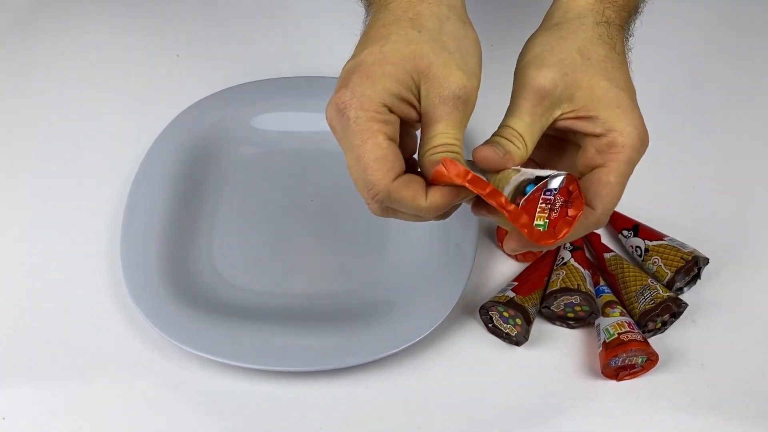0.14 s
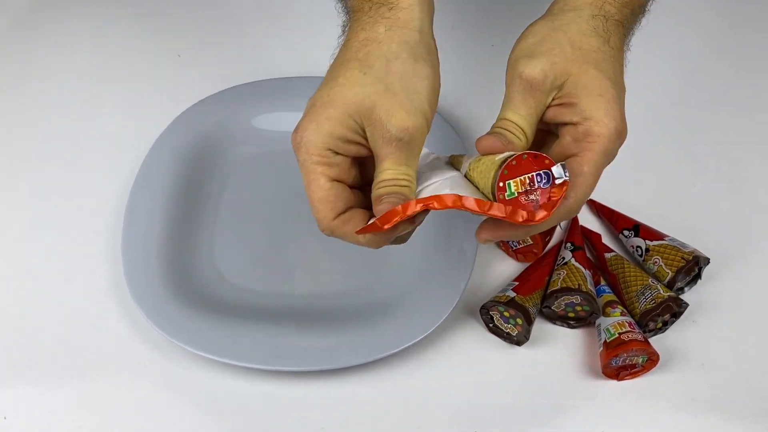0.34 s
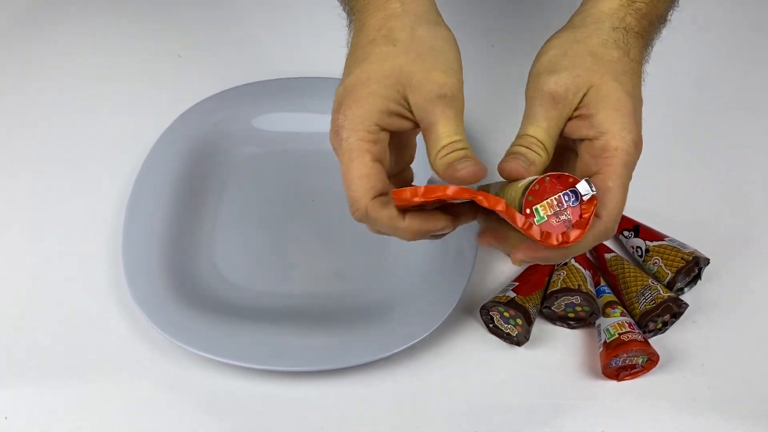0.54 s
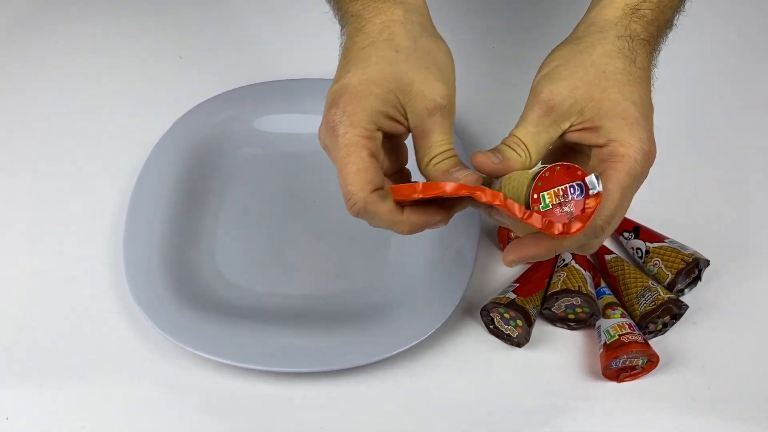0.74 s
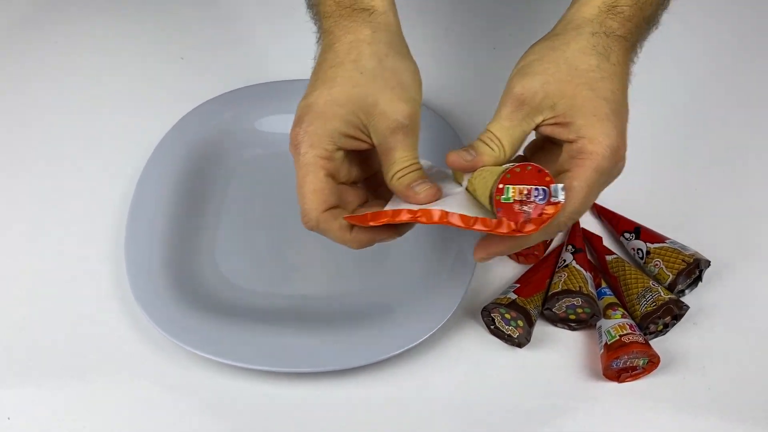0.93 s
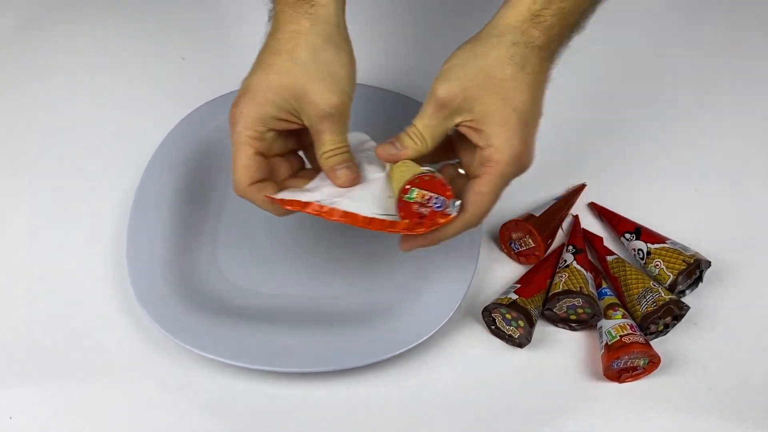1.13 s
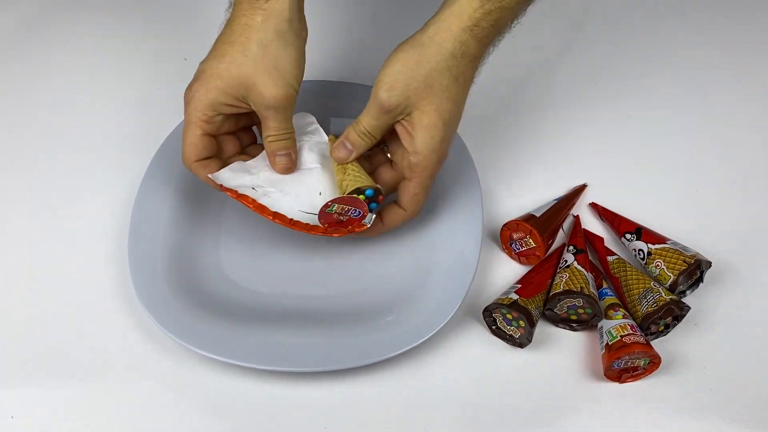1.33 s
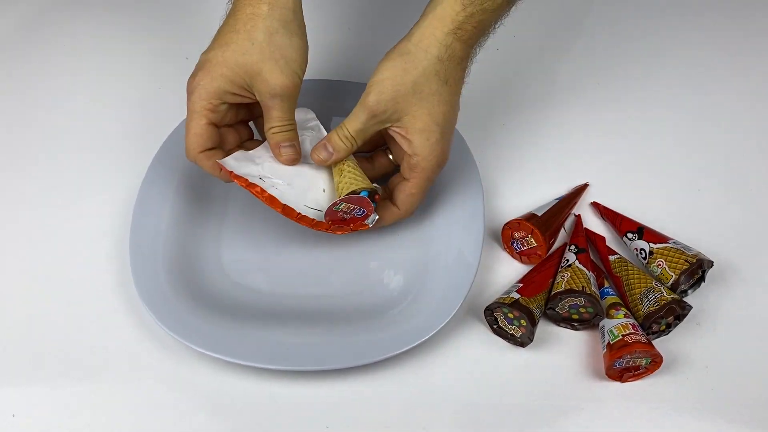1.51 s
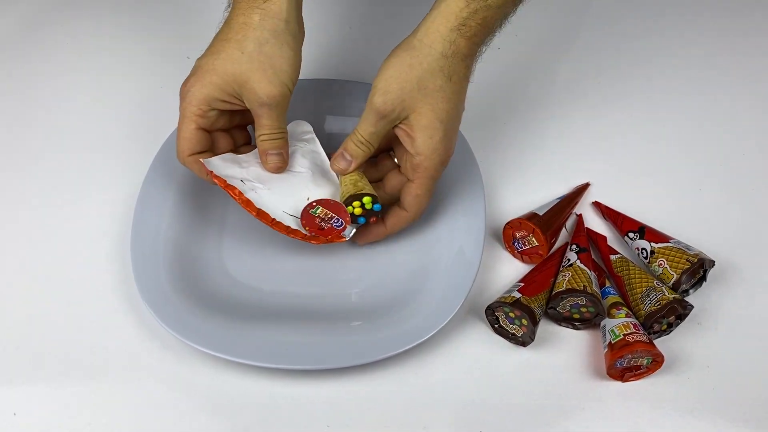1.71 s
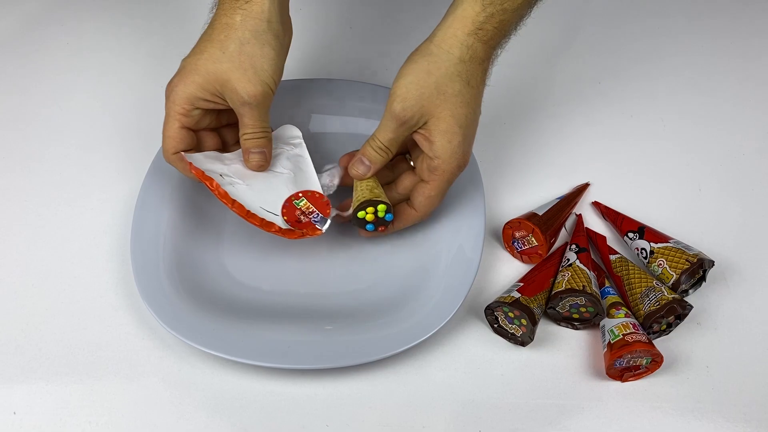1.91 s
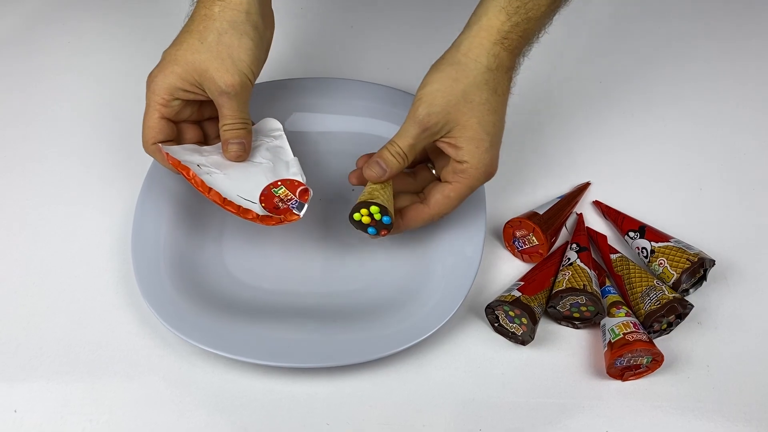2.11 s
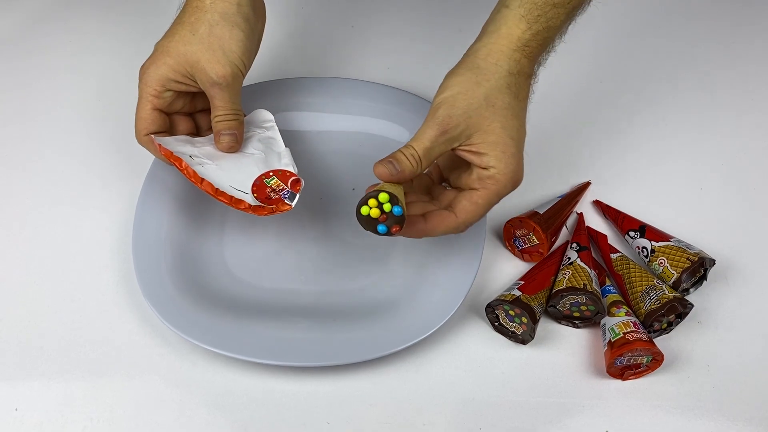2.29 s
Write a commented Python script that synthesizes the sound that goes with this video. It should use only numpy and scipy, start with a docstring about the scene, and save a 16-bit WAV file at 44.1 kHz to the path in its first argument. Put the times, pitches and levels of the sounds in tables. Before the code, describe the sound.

Foil wrapper crinkles close up in a small quiet room, starting faint, bursting into sharp cracks, then sporadic rustles and hollow buckles, a dull knock, more crackling and one final bright flick as it springs free.

```python
"""Peeling a chocolate cone

Hands peel a stiff foil-paper wrapper off a chocolate cone above a table, close to a stereo microphone in a small room.
Each pull sheds dense tiny crackles, made of random clicks that ring facets; creases snap as short noise bursts,
the rim crunches as noise through its modes, broad panels buckle with a hollow pop of decaying sines,
a hand bumps the table's low modes, and the freed wrapper gives a last ringing flick."""
import sys
import numpy as np
from scipy import signal
from scipy.fft import rfft, irfft
from scipy.io import wavfile
from scipy.ndimage import uniform_filter1d

SR = 44100
rng = np.random.default_rng(int(sys.argv[2]) if len(sys.argv) > 2 else 0)


def dump(signal):
    """Clip the signal to [-1, 1] and save it as 16-bit WAV at the path in sys.argv[1]."""
    limited = np.clip(np.atleast_2d(signal).T, -1, 1)
    pcm = np.round(limited * 32767).astype(np.int16)
    wavfile.write(sys.argv[1], SR, pcm)


N = 103635
T = np.arange(N) / SR  # seconds, whole scene
SHORT = T[:2048]  # seconds, one brief event


def undb(db):
    """Decibels to gain."""
    return 10 ** (np.asarray(db) / 20)


def unit(x):
    """Scale to rms 1."""
    return x / np.sqrt(np.mean(x ** 2))


def blow(x):
    """Scale a transient to the energy of one millisecond at rms 1."""
    return unit(x) * np.sqrt(0.001 * SR / x.shape[-1])


def band(x, lo_hz, hi_hz, order=3):
    """Band-pass."""
    edges_hz = [lo_hz, min(hi_hz, SR / 2 - 100)]
    return signal.sosfilt(signal.butter(order, edges_hz, "band", fs=SR, output="sos"), x)


def colour(x, points):
    """Minimum-phase filter through (Hz, dB) points, so that nothing sounds ahead of its cause."""
    hz, db = np.array(points, float).T
    size = 2 ** 18
    f = np.maximum(np.arange(size // 2 + 1) * SR / size, 1)
    cepstrum = irfft(np.log(undb(np.interp(np.log(f), np.log(hz), db))))
    # Fold the cepstrum onto positive time
    cepstrum[1:size // 2] *= 2
    cepstrum[size // 2 + 1:] = 0
    return irfft(rfft(x, size) * np.exp(rfft(cepstrum)))[..., :N]


def pair(x, lag_ms):
    """A sound reaches the two microphones at different moments: left late if positive, right if negative."""
    spectrum = rfft(x)
    f = np.arange(spectrum.shape[-1]) * SR / x.shape[-1]
    late_s = np.maximum([[lag_ms], [-lag_ms]], 0) / 1000
    return irfft(spectrum * np.exp(-2j * np.pi * f * late_s), x.shape[-1])


def add(out, x, start):
    """Mix a sound in at a time."""
    i = max(int(start * SR), 0)
    out[:, i:i + x.shape[-1]] += x[..., :N - i]


def swell(rise):
    """Quick swell and decay, peak 1."""
    return SHORT / rise * np.exp(1 - SHORT / rise)


def strike(rise, decay):
    """Sudden rise and exponential decay."""
    return np.exp(-SHORT / decay) * (1 - np.exp(-SHORT / rise))


def burst(envelope, apart):
    """A noisy burst, partly different at each microphone."""
    noise = rng.standard_normal((3, len(SHORT)))
    apart = np.clip(apart, 0, 1)
    return envelope * (np.sqrt(1 - apart) * noise[0] + np.sqrt(apart) * noise[1:])


def ring(chatter, modes, pitch=1):
    """A chatter of contacts rings (Hz, dB, width Hz) modes."""
    total = 0
    for hz, db, width in modes:
        mode = band(chatter, pitch * hz - width / 2, pitch * hz + width / 2, order=1)
        total = total + undb(db) * blow(mode)
    return blow(total)


def diffuse():
    """Noise from all directions: alike at both microphones in the bass, unrelated in the treble."""
    mic_spacing_s = 0.00056  # as travel time of sound
    alike = np.sinc(2 * mic_spacing_s * np.arange(N // 2 + 1) * SR / N)
    mid, side = irfft(rfft(rng.standard_normal((2, N))) * np.sqrt([1 + alike, 1 - alike]), N)
    return np.array([mid + side, mid - side]) / np.sqrt(2)


def background():
    """A faint, steady low background: diffuse noise, coloured."""
    # Spectrum of the background. Each row: frequency in Hz, level in dB.
    hum_colour = [(25, -27.5), (50, -14.5), (90, -4), (130, -14.5), (200, -14.5), (400, -21), (1000, -27.5),
                  (4000, -25.5), (16000, -41)]
    return undb(-68.5) * unit(colour(diffuse(), hum_colour))


def room(x, count=11):
    """A small room's diffuse tail: each band of noise decays at its own pace, fastest at the very top."""
    # Reverberation. Each row: frequency in Hz, level in dB, time to fall by 60 dB in seconds.
    room_bands = [(99, 7, 0.27), (500, -6.5, 0.22), (1462, -5.5, 0.3), (3650, -7, 0.24), (9220, -9.5, 0.26),
                  (16000, -5.5, 0.088)]
    delay_s = 0.00033
    hz, db, t60 = np.array(room_bands).T
    noise, response = rfft(diffuse()), 0
    f = np.arange(N // 2 + 1) * SR / N
    edges = np.geomspace(60, 17000, count + 1)
    for lo, hi in zip(edges, edges[1:]):
        centre = np.log(lo * hi) / 2
        band_db = np.interp(centre, np.log(hz), db)
        band_t60 = np.interp(centre, np.log(hz), t60)
        tail = np.clip(T / delay_s - 1, 0, 1) * np.exp(-np.log(1000) * T / band_t60)
        band_noise = irfft(noise * ((f >= lo) & (f < hi)), N)
        response = response + undb(band_db) * band_noise * tail / np.sqrt(np.sum(tail ** 2))
    return signal.fftconvolve(x, response, axes=1)[:, :N]


def bump():
    """A soft knock of the hand rings the low modes of the table as decaying sines."""
    # Modes of the table. Each row: frequency in Hz, level in dB, decay in seconds.
    table_modes = [(72, 1.5, 0.024), (131, 9, 0.012), (182, -2, 0.015), (300, -19.5, 0.016)]
    start_s, level_db, rise_s = 1.5215, -30.5, 0.0091
    t = np.maximum(T - start_s, 0)
    thud = sum(undb(db) * np.sin(2 * np.pi * hz * t) * np.exp(-t / decay) for hz, db, decay in table_modes)
    soft_onset = 1 - np.exp(-(t / rise_s) ** 2)
    return undb(level_db) * thud * soft_onset * undb([[-0.9], [0.9]])  # slightly to the right


def flicks():
    """The empty wrapper springs back with a short chatter that rings it, then settles with a lower rustle."""
    # Last flicks. Each row: start in seconds, level in dB, rise and decay in seconds, pitch factor.
    flick_events = [(2.0773, -22.5, 0.0003, 0.0066, 0.96), (2.15, -49, 0.008, 0.009, 0.85),
                    (2.162, -56.5, .002, 0.0029, .87)]
    # Modes of the freed wrapper. Each row: frequency in Hz, level in dB, width in Hz.
    flick_modes = [(928, -12.5, 12), (1258, -10.5, 89), (2396, 0.5, 220), (2784, 6, 105), (2810, -1.5, 200),
                   (3613, 3.5, 43), (3940, -3.5, 67), (4390, -10.5, 22), (5860, -16, 120), (6880, -5, 380),
                   (7040, -5, 540), (8800, -2.5, 360), (10470, -13, 95), (16160, 1.5, 760)]
    crack_db, low_hz, apart = -15.5, 1850, 0.66
    out = np.zeros((2, N))
    for start, db, rise, decay, pitch in flick_events:
        chatter = band(burst(strike(rise, decay), apart), low_hz, 22000, order=1)
        ringing = ring(chatter, flick_modes, pitch)
        add(out, undb(db) * (ringing + undb(crack_db) * blow(chatter)), start)
    return out


def crunches():
    """The stiff folded rim gives way in a clump of cracks, a noise burst that rings its modes."""
    # Crunches of the rim. Each row: start in seconds, level in dB, rise and decay in seconds.
    crunch_events = [(.2497, -21.5, 0.00021, 0.0013), (.381, -23.5, 0.00016, 0.0053),
                     (.867, -32.5, .0003, .003), (1.8296, -27, 0.0003, 0.0077),
                     (1.8434, -30, 0.00016, 0.003), (1.86, -47, 0.0006, 0.003)]
    # Modes of the rim. Each row: frequency in Hz, level in dB, width in Hz.
    rim_modes = [(1316, -3.5, 20), (1422, -3, 27), (1880, -5.5, 41), (2097, 3.5, 130), (2252, -10.5, 16),
                 (3270, -6.5, 27), (3790, -0.5, 26), (4020, -7.5, 200), (6970, -3.5, 210)]
    out = np.zeros((2, N))
    for start, db, rise, decay in crunch_events:
        add(out, undb(db) * ring(burst(strike(rise, decay), apart=0.17), rim_modes), start)
    return out


def pops():
    """A broad panel buckles abruptly: a few cycles of a hollow note, shorter overtones and a papery rattle."""
    # Buckling panels. Each row: start in seconds, level in dB ahead of the mix, pitch in Hz,
    # overtone level in dB.
    panels = [(0.0562, -37, 694, -20), (0.2341, -42, 1310, -8), (.2495, -40, 930, -15),
              (.3028, -25.5, 780, -26), (0.3228, -35, 853, -12), (0.3312, -36, 1270, -22),
              (.3508, -36, 594, -18), (.357, -40, 740, -12), (0.3718, -33.5, 560, -8),
              (.381, -31.5, 857, -23), (0.5028, -44, 470, -12), (.513, -49.5, 563, -10),
              (.5285, -27.5, 671, -19.5), (0.5493, -37.5, 385, -5), (0.56, -37.5, 570, -28),
              (.768, -41, 570, -8), (0.7783, -47.5, 530, -23), (.7928, -39.5, 547, -10.5),
              (.800, -40.5, 680, -6), (.8165, -33.5, 580, -19), (.838, -56.5, 592, -10),
              (.8675, -32, 755, -1.5), (.8785, -41, 595, -9), (.8935, -49.5, 740, 1),
              (.9115, -35.5, 594, -7), (.9215, -38.5, 650, -14), (0.9298, -40, 584, -6.5),
              (1.030, -50.5, 704, -13.5), (1.1173, -43.5, 760, -1.5), (1.1225, -49, 790, -2),
              (1.1325, -42, 723, 2), (1.1548, -44, 750, 10.5), (1.1597, -26.5, 763, -4),
              (1.1645, -39, 595, -5), (1.170, -37.5, 615, 1), (1.1785, -40.5, 815, 0.5),
              (1.1845, -42.5, 627, -1), (1.1963, -46.5, 600, -1), (1.847, -44.5, 390, -12),
              (1.953, -51.5, 537, -9.5)]
    # Overtones. Each row: multiple of the pitch, level in dB on top of the panel's overtone level.
    pop_overtones = [(1.72, 1), (2.4, -10.5)]
    rise_s, ring_s, overtone_ring_s, rattle_db = 0.00081, 0.0035, 0.0022, -19
    out = np.zeros((2, N))
    for start, db, hz, overtone_db in panels:
        noise = rng.standard_normal(len(SHORT))
        rattle = undb(rattle_db) * unit(band(noise, hz * 0.7, hz * 2.2))
        overtones = sum(undb(overtone_db + g) * np.sin(2 * np.pi * hz * multiple * SHORT)
                        for multiple, g in pop_overtones)
        note = (np.sin(2 * np.pi * hz * SHORT) + rattle) * strike(rise_s, ring_s)
        note = note + overtones * strike(rise_s, overtone_ring_s)
        add(out, undb(db) * band(note, hz * 0.73, hz * 4, order=2), start)
    return out * undb([[0.7], [-0.7]])  # slightly to the left


def snaps():
    """A crease flips within a millisecond and the foil rings briefly, each crease at a note of its own."""
    # Snapping creases. Each row: start in seconds, then middle, treble and top level in dB ahead of the mix.
    creases = [(0.0259, -41.5, -34, -46), (0.048, -55, -46, -59.5), (0.0561, -41.5, -31, -41),
               (0.0957, -55, -55, -48), (0.1895, -61, -41, -43), (0.2143, -71, -33.5, -39),
               (0.22, -83, -39, -27.5), (0.236, -25.5, -20.5, -42.5), (0.2486, -14, -17.5, -36),
               (0.302, -24.5, -27, -47), (0.331, -27.5, -41, -24.5), (0.37, -39, -23, -19),
               (0.3765, -51, -29.5, -25), (0.3806, -23.5, -39, -39.5), (0.388, -35.5, -31.5, -29.5),
               (0.5272, -39, -62.5, -61.5), (0.5603, -33.5, -36, -63), (0.592, -72, -45.5, -48),
               (0.6465, -42, -66, -73), (.6888, -46.5, -47.5, -50), (0.801, -46.5, -63.5, -60),
               (0.8319, -63, -45.5, -47), (0.8404, -42, -47, -33.5), (0.849, -30.5, -36.5, -50),
               (0.8663, -30.5, -45.5, -27), (0.9272, -54, -54.5, -32), (1.1306, -64.5, -50, -31.5),
               (1.1405, -47.5, -55.5, -34.5), (1.18, -39, -44.5, -39.5), (1.1867, -55.5, -34.5, -55),
               (1.417, -59, -36.5, -39), (1.4197, -60, -36.5, -32.5), (1.433, -51, -43, -43.5),
               (1.4455, -61, -46.5, -50), (1.4695, -70, -50.5, -57), (1.486, -60, -52, -58),
               (1.604, -54.5, -36, -32.5), (1.6107, -40, -26, -35), (1.6544, -50, -38, -35.5),
               (1.679, -49, -58, -54.5), (1.707, -60, -49, -47), (1.747, -67, -44, -47.5),
               (1.827, -41, -33, -39), (1.8421, -58.5, -35.5, -37.5)]
    # Limits of the three bands in Hz.
    snap_edges = [1200, 3500, 8000, 16000]
    rise_s, ring_s, ring_db = 0.0007, 0.003, -10
    centre_hz, spread_octaves, note_db = 5200, 0.52, 6
    apart, lag_spread_ms = 0.03, 0.04
    out = np.zeros((2, N))
    envelope = swell(rise_s) ** 3 + undb(ring_db) * np.exp(-SHORT / ring_s)
    for start, *dbs in creases:
        crack = burst(envelope, apart)
        note_hz = centre_hz * 2 ** (spread_octaves * rng.uniform(-1.2, 1))
        crack = crack + undb(note_db) * band(crack, note_hz * 0.93, note_hz * 1.07, order=1)
        sound = sum(undb(db) * blow(band(crack, lo, hi))
                    for db, lo, hi in zip(dbs, snap_edges, snap_edges[1:]))
        add(out, pair(sound, lag_spread_ms * rng.uniform(-1.4, 1)), start)
    return out


def pull_power():
    """Power of the hands' pulls in three bands: each swells, holds and lets go."""
    # Pulls and rubs. Each row: start and length in seconds, then low, middle and treble level in dB
    # ahead of the mix.
    pulls = [(0.0, 0.041, -75.5, -63, -54.5), (0.043, 0.018, -68.5, -52, -79),
             (0.107, 0.066, -93, -70.5, -59), (0.174, 0.13, -77.5, -60.5, -50.5),
             (0.224, 0.033, -50.5, -72, -32.5), (0.246, 0.1, -48, -41, -34.5),
             (0.337, 0.028, -46.5, -44.5, -40), (0.366, 0.024, -36, -50, -41),
             (0.447, 0.013, -75, -79, -54.5), (0.493, 0.033, -53.5, -53, -51),
             (0.516, 0.13, -68.5, -67, -60.5), (0.666, 0.064, -71.5, -66.5, -57.5),
             (0.743, 0.066, -67, -63.5, -56), (0.792, 0.034, -60.5, -60.5, -61.5),
             (0.832, 0.041, -63, -49, -43.5), (0.872, 0.052, -51, -47.5, -45),
             (0.926, 0.025, -55, -58.5, -52.5), (1.023, 0.022, -65.5, -68, -65.5),
             (1.031, 0.097, -78, -104, -70), (1.099, 0.1, -54.5, -59.5, -51),
             (1.163, 0.034, -64, -52, -47.5), (1.227, 0.052, -92.5, -65.5, -64),
             (1.275, 0.011, -62, -62, -59), (1.307, 0.047, -93.5, -67, -65),
             (1.399, 0.02, -61, -59.5, -64.5), (1.408, 0.06, -61, -54.5, -59),
             (1.478, 0.1, -80, -68.5, -69), (1.591, 0.093, -57.5, -50, -53.5),
             (1.673, 0.075, -61, -58.5, -58), (1.755, 0.14, -74, -62, -61.5),
             (1.82, 0.027, -48.5, -45, -46.5), (1.848, 0.039, -53.5, -51, -62),
             (1.898, 0.12, -85.5, -68.5, -66.5), (1.938, 0.029, -69, -63.5, -64)]
    attack_s, release_s = 0.005, 0.00062
    swell_share = 0.18  # share of a pull's length added to the attack
    power = np.zeros((3, N))
    for start, length, *dbs in pulls:
        rise = np.clip((T - start) / (attack_s + swell_share * length), 0, 1)
        release = np.exp(-np.maximum(T - start - length, 0) / release_s)
        power += (undb(dbs)[:, None] * rise * release) ** 2
    return power


def crinkle(count=14):
    """Many facets crackle, each with its own ring and place; harder pulls shed more and louder crackles."""
    # Tone of the crackles. Each row: frequency in Hz, level in dB.
    crackle_colour = [(70, -8.5), (180, -24), (300, -7), (450, -3), (700, 4.5), (1000, -0.5), (1400, 5.5),
                      (2200, 11), (3000, 1), (4000, -0.5), (7000, -2.5), (11000, -3.5), (16000, 0.5)]
    # Limits of the three bands of the pulls in Hz.
    pull_edges = [70, 1200, 4000, 16000]
    top_rate, rate_power = 3900, 0.15  # crackles per second at full effort, exponent of effort
    spread_db, crackle_s = 3, 0.00022
    shift_s, shift_db = 0.013, 3  # each facet drifts in loudness
    lag_spread_ms = 0.039
    power = pull_power()
    effort = np.maximum(power.sum(0) / power.sum(0).max(), 1e-4)
    rate = top_rate * effort ** rate_power
    stream = np.zeros((2, N))
    for lag_ms in np.linspace(-lag_spread_ms, lag_spread_ms, count):
        shift = np.interp(T / shift_s, np.arange(len(SHORT)), rng.uniform(-1.2, 1, len(SHORT)))
        sizes = undb(spread_db * np.clip(rng.standard_normal(N), -2, 2) + shift_db * shift)
        # Dividing by the root of the rate leaves loudness to the pulls
        clicks = (rng.random(N) < rate / count / SR) * sizes / np.sqrt(rate)
        facet = pair(blow(swell(crackle_s) * rng.standard_normal(len(SHORT))), lag_ms)
        stream += signal.fftconvolve(clicks[None], facet)[:, :N]
    stream = colour(stream, crackle_colour)
    return sum(np.sqrt(p) * unit(band(stream, lo, hi))
               for p, lo, hi in zip(power, pull_edges, pull_edges[1:]))


def microphones(x):
    """Both microphones have two notches in the treble; at the top the left one lags."""
    # Microphone response. Each row: frequency in Hz, level in dB.
    mic_colour = [(22, -26.5), (45, -2.5), (70, -8), (6000, 1), (8300, 3), (8800, -14), (9250, -5),
                  (9800, -2), (10600, 2.5), (12300, 1), (12900, -23), (13400, -21), (14000, -15),
                  (14800, 6.5), (16000, -29.5)]
    split_hz, treble_lag_ms = 6780, 0.24
    above = np.maximum(np.arange(N // 2 + 1) * SR / N - split_hz, 0)
    left = irfft(rfft(x[0]) * np.exp(-2j * np.pi * above * treble_lag_ms / 1000), N)
    return colour(np.array([left, x[1]]), mic_colour)


def suppress(x):
    """Noise suppressor: above the bass, very quiet sound is turned further down, to a quarter at most."""
    threshold_db, slope, smoothing_s, from_hz = -61.5, 1, 0.064, 110
    upper = signal.sosfiltfilt(signal.butter(2, from_hz, "high", fs=SR, output="sos"), x)
    level = np.sqrt(np.abs(uniform_filter1d(np.mean(upper ** 2, axis=0), int(smoothing_s * SR))))
    gain = np.clip(level / undb(threshold_db), 0.25, 1) ** slope
    return x - upper * (1 - gain)


def scene():
    """Wrapper and table in the room, over a faint low background."""
    wrapper = undb(1.0) * crinkle() + undb(-0.5) * snaps() + undb(6.5) * pops() + crunches() + flicks()
    knock = bump()
    reverb = room(wrapper + undb(-8.5) * knock)  # the knock excites the room less
    return wrapper + knock + reverb + background()


def record(dry):
    """The microphones colour the sound; quiet hiss is suppressed and the top is cut."""
    top_cut = signal.ellip(10, 0.2, 80, 16300, fs=SR, output="sos")  # ripple dB, stop dB, Hz
    return signal.sosfilt(top_cut, suppress(microphones(dry)))


dry = scene()
out = record(dry)
dump(out)
```